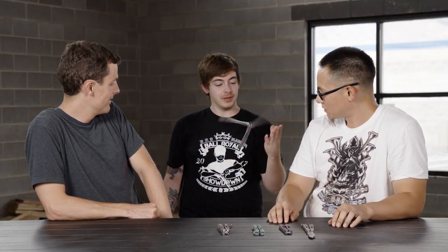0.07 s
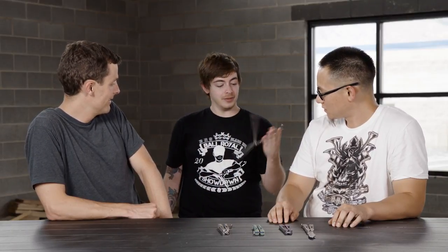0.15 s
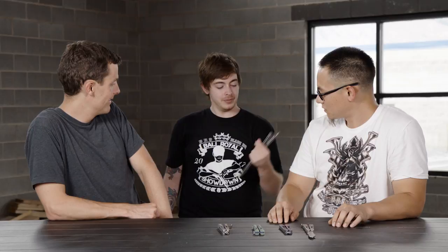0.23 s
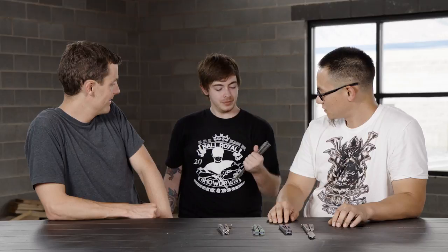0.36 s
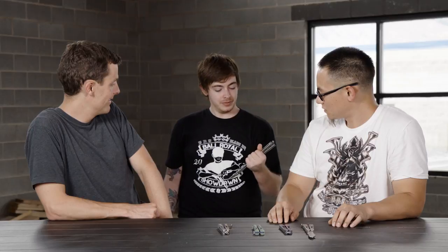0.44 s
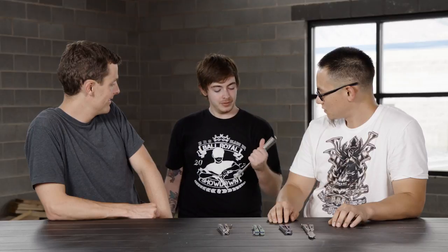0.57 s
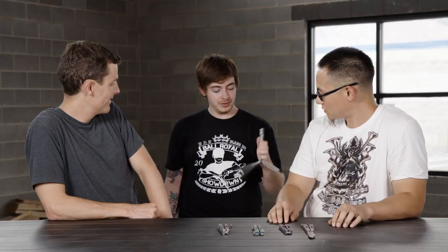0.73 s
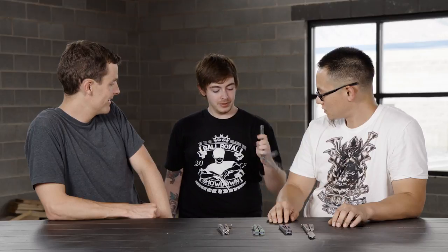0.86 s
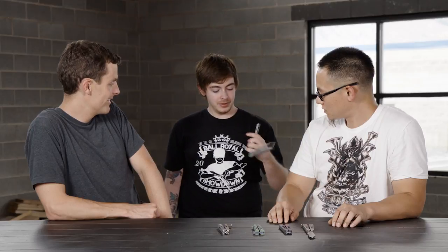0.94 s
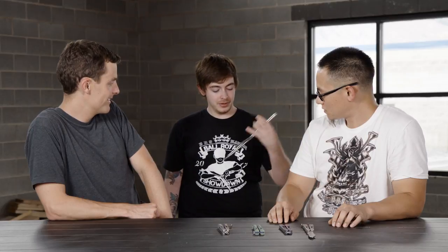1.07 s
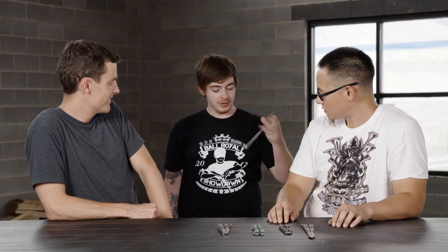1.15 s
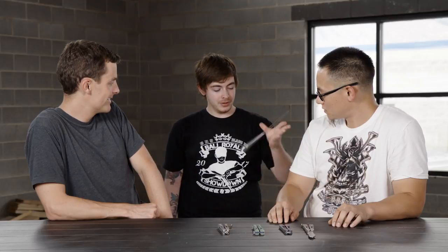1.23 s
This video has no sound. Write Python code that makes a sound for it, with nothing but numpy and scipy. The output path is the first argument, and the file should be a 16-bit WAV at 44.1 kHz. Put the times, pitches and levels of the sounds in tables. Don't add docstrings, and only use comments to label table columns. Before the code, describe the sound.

Sharp steel clatter of a folding knife's handles and blade, twirled close to the microphone indoors

```python
import sys
import numpy as np
from scipy import signal
from scipy.fft import rfft, irfft
from scipy.io import wavfile

SR = 44100
rng = np.random.default_rng(int(sys.argv[2]) if len(sys.argv) > 2 else 0)


def file_out(sig):
    cols = np.atleast_2d(sig).T
    lim = np.clip(cols, -1, 1)
    pcm = np.round(lim * 32767).astype(np.int16)
    wavfile.write(sys.argv[1], SR, pcm)


def magnitude_from_level(level_db):
    exponent = np.asarray(level_db, float) / 20
    return 10 ** exponent


N = 57330


def unit(x):
    return x / np.sqrt(np.mean(x ** 2) + 1e-30)


def shaped(gain):
    hz = np.arange(N // 2 + 1) * SR / N + 1
    return unit(irfft(rfft(rng.standard_normal(N)) * gain(hz), N))


def decay(t, t60):
    return np.exp(-np.log(1000) * t / t60)


def ring(hz, t60, size=8192):
    t = np.arange(size) / SR
    return np.sin(2 * np.pi * hz * t) * decay(t, t60)


def add(out, s, x):
    i = int(s * SR)
    out[i:i + len(x)] += x[:N - i]


def highpass(x, order, hz):
    return signal.sosfilt(signal.butter(order, hz, "high", fs=SR, output="sos"), x)


def air():
    # (frequency [Hz], density [dB per Hz])
    spectrum = [(82, -39), (140, -1.5), (342, -9.5), (479, -11), (632, -19.5), (1600, -24.5), (3410, -29),
                (12900, -28.5), (16000, -29)]
    # (frequency [Hz], width [Hz], level [dB])
    ducts = [
        (106.8, 35.3, -56),
        (172.4, 24, -63.5),
        (230.7, 4.4, -70.5),
        (1590, 210, -86.5),
    ]
    air_db = -58.5
    hum_hz, hum_db, hum_wobble_db = 58.5, -54, 1.5
    hz, db = np.array(spectrum).T

    def flow_gain(f):
        return magnitude_from_level(np.interp(np.log(f), np.log(hz), db)) / (1 + (90 / f) ** 4)

    out = magnitude_from_level(air_db) * shaped(flow_gain)
    for centre_hz, width_hz, level_db in ducts:
        out = out + magnitude_from_level(level_db) * shaped(lambda f: 1 / (1 + (2 * (f - centre_hz) / width_hz) ** 2))
    wobble = shaped(lambda f: 1 / (1 + (f / 6) ** 4))
    hum = np.sin(2 * np.pi * hum_hz * np.arange(N) / SR)
    return out + magnitude_from_level(hum_db + hum_wobble_db * wobble) * hum


def chatter(ms, peak_ms, chance):
    bumps_per_ms, spread_db, first_db = 12, 4, 5
    start, fade = .45, .6
    t = np.arange(chance.shape[1]) * 1000 / SR
    hit = chance[0] < bumps_per_ms * 1000 / SR
    rise = start + (1 - start) * t / peak_ms
    fall = np.exp((peak_ms - t) / (fade * ms))
    swell = np.where(t < peak_ms, rise, fall) * (t < ms)
    strength = magnitude_from_level(-spread_db * np.log(chance[1] + .05))
    sign = np.sign(chance[2:] - .5)
    blows = hit * strength * swell * sign
    blows[:, 0] = magnitude_from_level(first_db)
    return blows


def steel_contacts():
    # (time [s], chatter [ms], strongest moment [ms])
    catch_at = [(.2116, 2.2, .2), (.2137, 2.8, .05), (.2170, 4.2, 3.2), (.2220, 2.7, 2.2), (.2250, 4, 1),
                (.2537, 4.2, .8), (.2611, 4, .1), (.2725, 7, 3), (.2898, 3, .6), (.2957, 4.5, .4),
                (.3045, 3, 1), (.3132, 3, .3), (.3180, 2.4, .7), (.3213, 3.2, .6), (.3311, 2, .9),
                (.3331, 5.8, 1.2), (.3393, 2.5, .6), (.3490, 5, 1.2), (.3575, 2, .3), (.3635, 7, 3.4),
                (.4400, 3, .5), (.4477, 5, 1), (.4980, 4, .6)]
    twirl_at = [(.7324, 3, .5), (.7358, 3, .5), (.7388, 3.5, .8), (.8770, 6, 1), (.9577, 4, 1.2),
                (.9735, 1, .2), (.9998, 2, .1), (1.0021, 1.6, .1), (1.0215, 1, .2), (1.0241, 5.8, .6),
                (1.0303, 2.6, .4), (1.0340, 3.5, .5), (1.0380, 5, 1.6), (1.0455, 2, .6), (1.0495, 2, .5),
                (1.052, 5, 2), (1.0615, 3.5, 1.8), (1.0655, 4, 1.2), (1.0725, 5, 2.3), (1.0783, 2, .2),
                (1.0815, 3, 2), (1.0850, 4.5, .2), (1.111, 16, 6), (1.131, 6, 2), (1.138, 3.5, 1.5),
                (1.143, 8, 3.5), (1.1965, 5, .5), (1.229, 6, 2), (1.25, 5, 1), (1.29, 6, 2.5)]
    # (level [dB], loudest zone [Hz], weight of low modes [dB], weight of top modes [dB])
    catch = [(-25, 13700, -27, 1), (-24.5, 16000, -14, 1), (-27, 10800, -12, 0), (-15.5, 9800, -8, 2),
             (-24, 11400, -12, 2), (-26, 5900, -8, -2), (-19.5, 4170, 0.5, -9), (-35, 9200, -23, -2),
             (-34, 10500, -19, -8), (-14, 6500, -2.5, -2), (-39, 12000, -4, -3), (-31, 18000, -16, -2),
             (-15, 8140, -7, 9.5), (-23, 6100, -18, -6), (-21.5, 9500, 0, 5), (-13.5, 9500, 3, 8.5),
             (-24.5, 17000, 2, -7), (-26.5, 8000, -7, -2), (-43, 15000, -22, -2), (-28, 7600, -19, -9),
             (-43, 7300, -2, -7), (-33.5, 7700, -3, -5), (-42.5, 7400, -25, -10)]
    twirl = [(-32, 10200, -22, 3), (-46, 6000, -20, 0), (-32, 8500, -41, -3), (-48, 11600, -4, 4),
             (-39, 10600, -11, -6), (-56, 12000, 3, 0), (-39.5, 12300, -20, -7), (-36.5, 9800, -18, -10),
             (-51, 6200, -10, 0), (-26.5, 9000, -10.5, -8), (-25.5, 11800, -17.5, -4),
             (-33.5, 8600, -26, -15), (-30.5, 12000, -10, -8), (-55, 7900, -22, -2), (-48, 12500, -18, 0),
             (-53, 11000, -18, -4), (-40, 4800, -8, 2), (-39, 8300, -10, -8), (-34, 9500, -6, -6),
             (-35, 8900, -12, -3), (-44, 16000, -5, -6), (-36, 10700, -8, -8), (-48.5, 6000, 9, -3),
             (-44, 8400, 9, -4), (-37, 10500, -17, -2), (-40, 8600, 1, 1), (-47.5, 2700, 3, 0),
             (-42.5, 8200, 1.5, -2), (-52, 12000, -16, -3), (-41, 13300, -7, 0)]
    # (frequency [Hz], level [dB], t60 [s])
    handles = [(1950, -19.5, 0.025), (2696, -16, 0.029), (3710, -7, 0.016), (4880, -5.5, 0.018),
               (5900, 0.5, 0.0078), (6480, -0.5, 0.0096), (7410, -3.5, 0.0082), (8520, -1.5, 0.012),
               (9530, 3, 0.0083), (10640, -0.5, 0.0072), (12030, 0.5, 0.0066), (12900, -3.5, 0.011),
               (14350, -1.5, 0.014), (15300, 0, 0.013)]
    zone_db, zone_oct = 9, 0.12
    low_hz, high_hz = 4750, 13200
    crack_db, crack_hz = -5.5, 6100
    scatter_db, detune, grip = 1.5, .015, .65
    light_hz, steel_floor_hz = 4500, 1200

    click = np.eye(1, 1024)[0]
    bright = signal.lfilter(*signal.butter(3, crack_hz, "high", fs=SR), click)
    top = signal.sosfiltfilt(signal.butter(4, high_hz, "high", fs=SR, output="sos"), bright)
    dull = signal.lfilter(*signal.butter(3, [2200, 6500], "band", fs=SR), click)
    heft = signal.butter(2, light_hz, fs=SR, output="sos")

    out = np.zeros(N)
    for (s, ms, peak_ms), (db, zone_hz, low_db, top_db) in zip(catch_at + twirl_at, catch + twirl):
        chance = rng.random((len(handles) + 3, 900))
        luck = rng.standard_normal((len(handles), 2))
        crack = bright + (magnitude_from_level(top_db) - 1) * top + magnitude_from_level(low_db + 6) * dull
        body = [magnitude_from_level(crack_db) * crack]
        for (hz, mode_db, t60), (level_luck, pitch_luck) in zip(handles, luck):
            near = np.exp(-.5 * (np.log2(hz / zone_hz) / zone_oct) ** 2)
            low = 1 / (1 + (hz / low_hz) ** 4)
            high = 1 / (1 + (high_hz / hz) ** 12)
            gain_db = mode_db + scatter_db * level_luck + zone_db * near + low_db * low + top_db * high
            body.append(0.14 * magnitude_from_level(gain_db) * ring(hz * (1 + detune * pitch_luck), grip * t60, size=1024))
        body = np.array(body)
        modes = signal.fftconvolve(chatter(ms, peak_ms, chance), body, axes=1)
        share = np.sqrt(np.sum(body ** 2, axis=1) / np.sum(modes ** 2, axis=1))
        x = share @ modes
        x = x - (1 - magnitude_from_level(min(low_db + 12, 0))) * signal.sosfiltfilt(heft, x)
        add(out, s, magnitude_from_level(db + 14) * x / np.sqrt(np.sum(x ** 2) + 1e-12))
    return highpass(out, 4, steel_floor_hz)


def room(x):
    early_db, early_t60_s = -14, .035
    late_db, late_t60_s, late_top_hz = -17.5, 0.56, 9100
    t = np.arange(SR // 2) / SR
    early, late = rng.standard_normal((2, len(t)))
    late = signal.lfilter(*signal.butter(1, late_top_hz, fs=SR), late)
    early = early * decay(t, early_t60_s) * np.clip(t / .003, 0, 1)
    late = late * decay(t, late_t60_s) * np.clip(t / .015, 0, 1)
    response = np.zeros(len(t))
    for part, db in ((early, early_db), (late, late_db)):
        response += magnitude_from_level(db) * part / np.sqrt(np.sum(part ** 2))
    return signal.fftconvolve(x, response)[:N]


def struck(table, push_ms):
    out = np.zeros(N)
    for s, db, hz, t60 in table:
        x = ring(hz, t60)
        push = np.clip(np.arange(len(x)) * 1000 / SR / push_ms, 0, 1)
        add(out, s, magnitude_from_level(db) * x * push)
    return out


def blade_ringing():
    # (time [s], level [dB], frequency [Hz], t60 [s])
    blade = [(.222, -49.5, 6950, 0.28), (.29, -49, 6950, 0.29), (.298, -48, 13150, 0.061),
             (.736, -42, 6950, 0.038), (.959, -61, 6950, 0.091), (1.041, -55, 6950, 0.072),
             (1.139, -44, 6930, 0.09), (1.146, -45.5, 6950, 0.066), (.43, -68.5, 2440, 0.43),
             (.55, -69.5, 2430, .5), (.66, -67.5, 1620, 0.39), (.74, -65, 1590, .5), (.95, -66, 1562, 0.39),
             (1.158, -57, 13150, .04), (1.084, -39, 6100, 0.019), (1.116, -56.5, 3620, .06)]
    return struck(blade, 2.2)


def palm_thuds():
    # (time [s], level [dB], frequency [Hz], t60 [s])
    thuds = [(.2545, -46, 1710, 0.0063), (.2611, -32.5, 1520, 0.007), (.2612, -38.5, 870, 0.0092),
             (.2962, -42.5, 790, 0.01), (.2966, -42, 1250, 0.0097), (.3182, -42, 790, 0.008),
             (.319, -40, 2057, 0.046), (.3328, -34, 540, 0.018), (.3332, -36, 735, 0.023),
             (.334, -36, 1266, 0.023), (.3334, -32.5, 2380, 0.04), (.3502, -42, 1060, 0.031),
             (.3642, -38, 625, 0.021), (.3662, -41.5, 2112, 0.057), (.4082, -45, 2400, 0.01),
             (.4392, -46, 2030, 0.012), (.4495, -40.5, 2080, 0.024), (.4992, -47, 2025, 0.028),
             (1.0842, -54, 1090, 0.017), (1.2112, -49.5, 2640, 0.01), (.223, -45, 1950, .012)]
    return struck(thuds, 0.3)


def handle_pings():
    # (time [s], level [dB], frequency [Hz], t60 [s])
    pings = [(.2236, -24, 5140, 0.011), (.2238, -35.5, 2810, 0.018), (.2613, -36, 3710, 0.02),
             (.2616, -26.5, 4880, 0.021), (.2545, -36, 6100, 0.011), (.2959, -33, 2620, 0.024),
             (.2962, -31, 3840, 0.0068), (.3345, -27.5, 5350, 0.0089), (.3186, -22, 8410, 0.01),
             (.319, -34, 3520, 0.025), (.3336, -23.5, 3860, 0.016), (.3337, -32, 15200, 0.013),
             (.4491, -47, 5900, 0.027), (.4492, -46, 3600, 0.031), (.7341, -59, 3690, 0.03),
             (.7342, -50, 5750, 0.022), (1.0006, -45, 5900, 0.012), (1.0631, -43, 3620, 0.01),
             (1.0762, -50.5, 3800, .02), (1.1981, -55.5, 2500, 0.012), (1.2311, -52.5, 6000, .02)]
    return struck(pings, 0.24)


def scene():
    knock_floor_hz, hiss_top_hz, side_db = 430, 15750, -33.5
    knife = steel_contacts() + blade_ringing() + palm_thuds() + handle_pings()
    knife = highpass(knife, 4, knock_floor_hz)
    edge = signal.ellip(8, .3, 50, hiss_top_hz, fs=SR, output="sos")
    mid = knife + signal.sosfilt(edge, room(knife) + air())
    side = signal.lfilter(*signal.butter(2, 300, "high", fs=SR), mid)
    side = magnitude_from_level(side_db) * np.roll(side, 40)
    return np.array([mid + side, mid - side])


def top_cut(x):
    return signal.sosfilt(signal.butter(12, 17140, fs=SR, output="sos"), x)


def record(dry):
    mix = signal.sosfilt(signal.cheby1(10, .5, 15900, fs=SR, output="sos"), dry)
    return top_cut(mix)


dry = scene()
out = record(dry)
file_out(out)
```